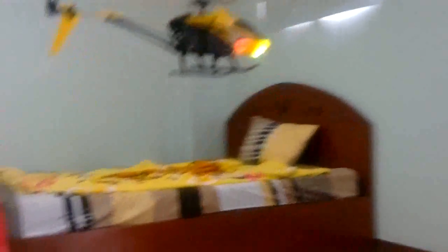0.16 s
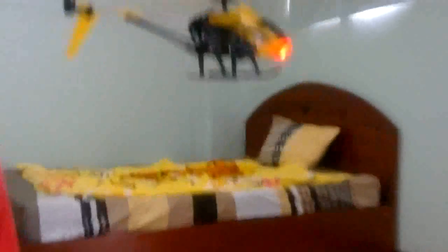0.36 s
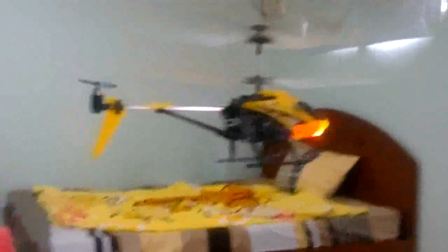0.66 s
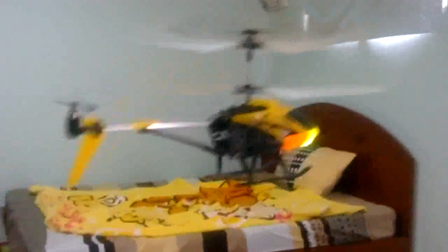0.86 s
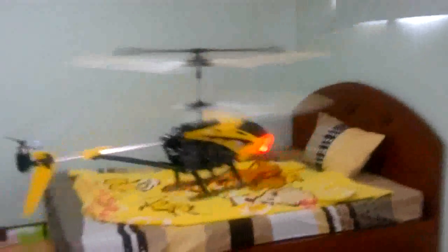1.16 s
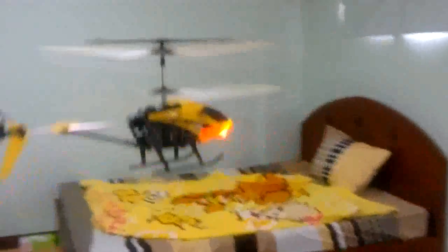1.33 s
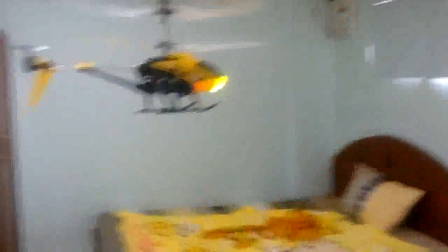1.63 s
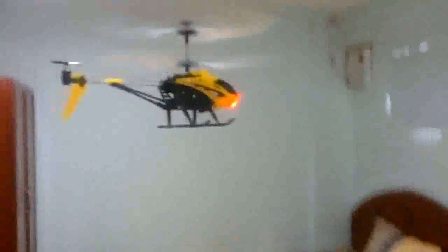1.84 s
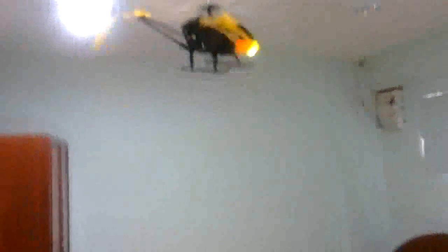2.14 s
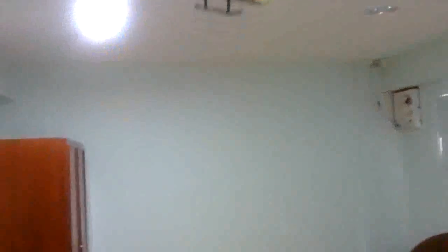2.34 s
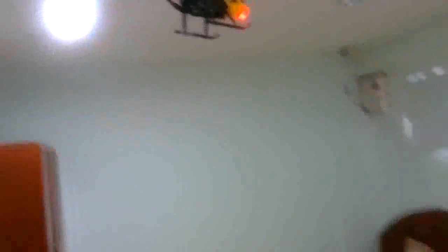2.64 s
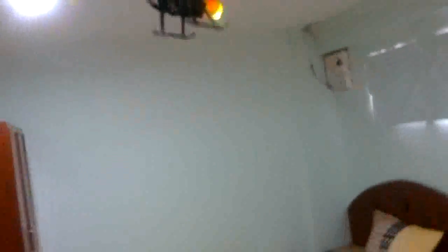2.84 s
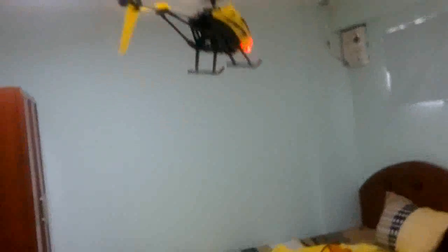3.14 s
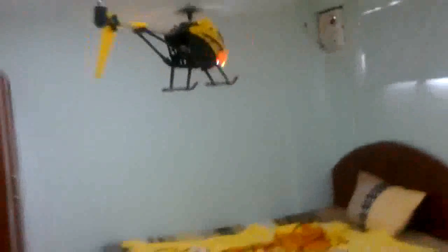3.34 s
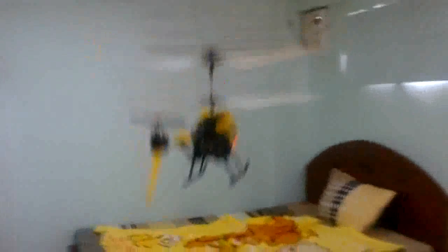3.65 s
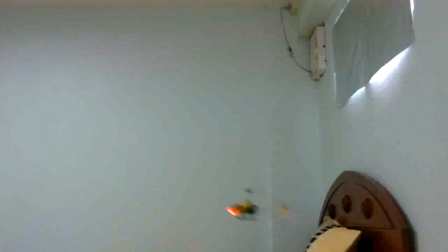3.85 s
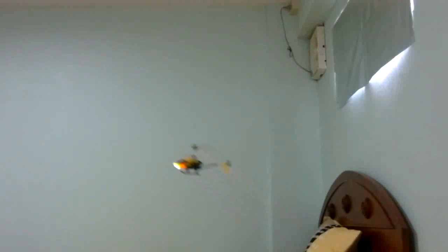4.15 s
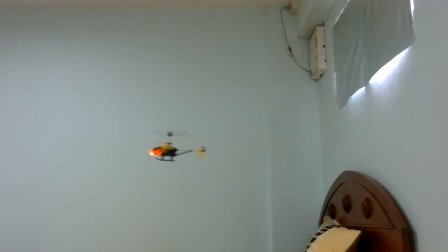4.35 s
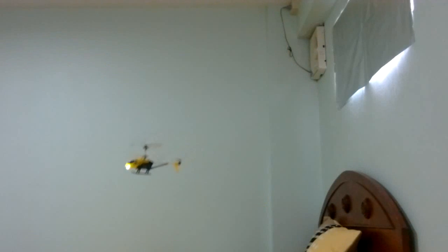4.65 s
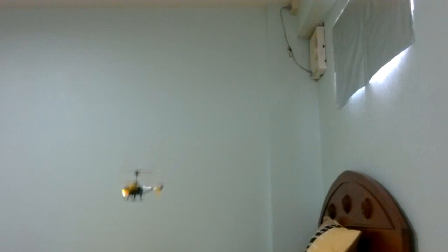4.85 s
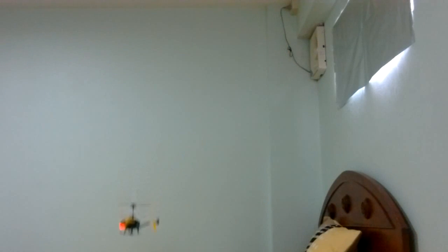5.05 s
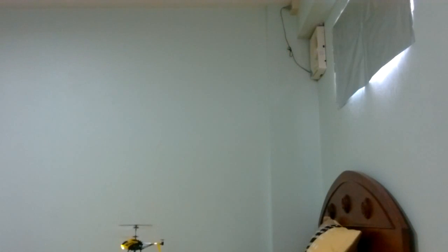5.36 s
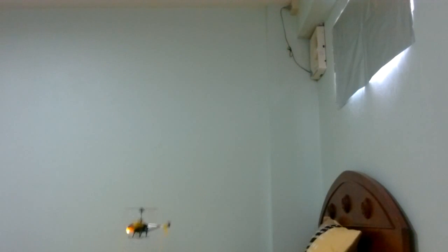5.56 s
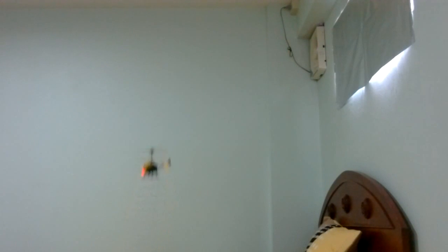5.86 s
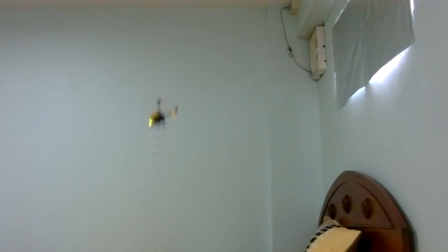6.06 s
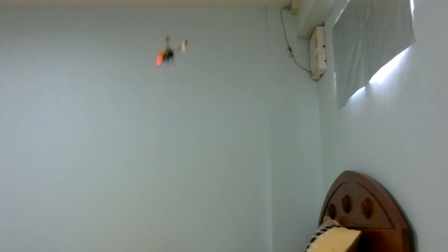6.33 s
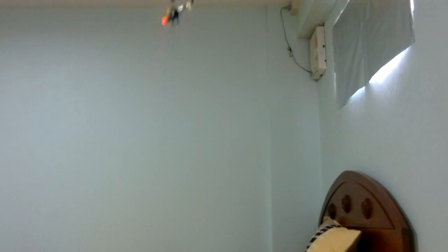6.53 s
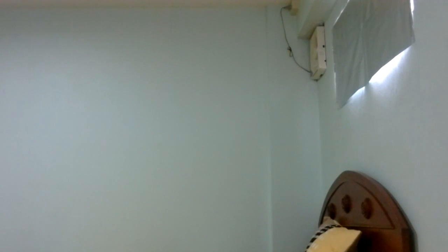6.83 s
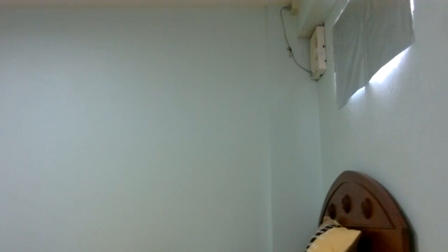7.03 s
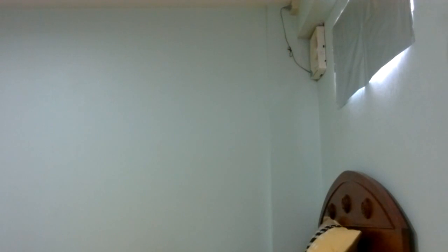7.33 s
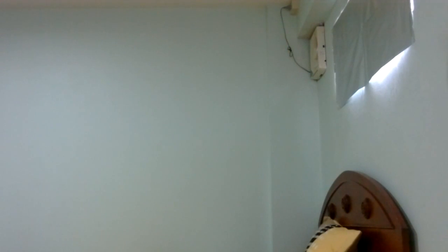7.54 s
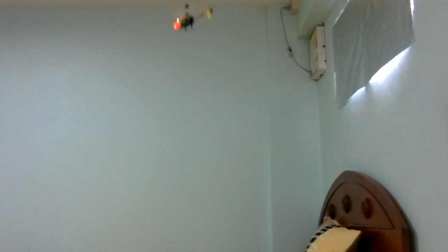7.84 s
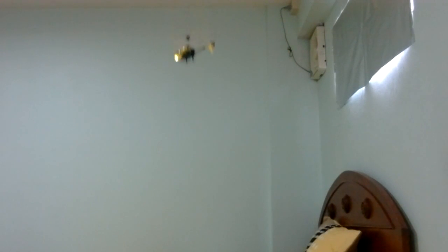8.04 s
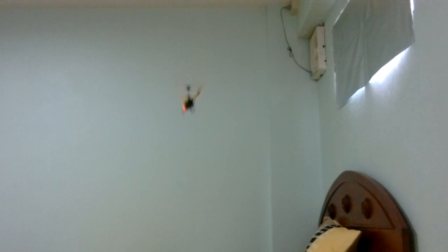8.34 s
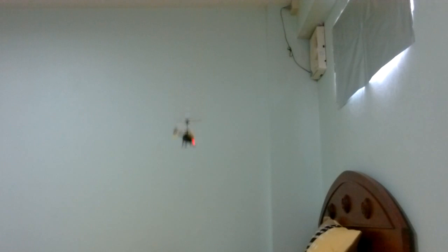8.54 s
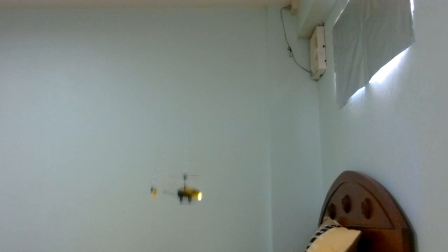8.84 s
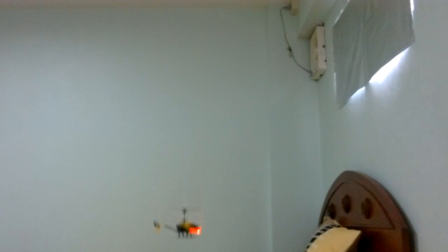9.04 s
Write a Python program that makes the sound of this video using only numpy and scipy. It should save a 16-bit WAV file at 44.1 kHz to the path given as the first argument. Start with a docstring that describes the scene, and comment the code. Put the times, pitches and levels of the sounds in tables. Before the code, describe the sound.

Two high motor tones whine together over rattling plastic gears and a light hiss as a toy helicopter flies around a bare room. It starts near the microphone, holding its pitch and then sagging a little. The sound cuts out for an instant and resumes at a distance, softer and with more room echo. There the whine keeps falling and rising, peaking around six seconds, and carries on to the end.

```python
"""A small coaxial toy helicopter flies about a bare bedroom, first close by, then farther off.
Two pulse-driven motors, one for each rotor, whine through plastic gears at the tooth-meshing rate,
which follows the throttle. Tooth impacts excite the frame's resonances, the brushes hiss by friction,
and the blades hum and stir the air. The walls add reverberation, a larger share at a distance."""
import sys
import numpy as np
from scipy import signal
from scipy.fft import rfft, irfft, next_fast_len
from scipy.io import wavfile
from scipy.ndimage import uniform_filter1d, map_coordinates

SR = 44100
rng = np.random.default_rng(int(sys.argv[2]) if len(sys.argv) > 2 else 0)


def to_wav(s):
    """Save 16-bit WAV."""
    ch = np.atleast_2d(s).T  # columns
    pcm = np.round(np.clip(ch, -1, 1) * 32767)  # PCM
    wavfile.write(sys.argv[1], SR, pcm.astype(np.int16))


N = 405279
TIME_S = np.arange(N) / SR

PINION_TEETH, WHEEL_TEETH = 7, 74
DRIVE_HZ = 541.2  # pulse rate of the motor current
NEAR_END_S, FAR_START_S = 3.849, 3.895


def amp(db):
    """Decibels to amplitude ratio."""
    return 10 ** (np.asarray(db) / 20)


def unit(x):
    """Normalisation to rms 1."""
    return x / np.sqrt(np.mean(x ** 2) + 1e-20)


def even(x):
    """Running normalisation to rms 1 over a tenth of a second; faster flutter stays."""
    return x / np.sqrt(np.abs(uniform_filter1d(x ** 2, SR // 10)) + 1e-12)


def along(points, hz):
    """Interpolation of (frequency_hz, value) points on a logarithmic frequency axis."""
    frequency_hz, values = np.transpose(points)
    return np.interp(np.log(hz + 1), np.log(frequency_hz + 1), values)


def wobble(rate):
    """Smooth random modulation: a spline through `rate` knots a second."""
    knots = rng.standard_normal(int(N * rate / SR) + 4)
    steps = np.arange(10 * len(knots)) / 10
    return np.interp(TIME_S * rate, steps, map_coordinates(knots, [steps]))


def filtered(x, response):
    """Linear filtering: the spectrum times a frequency response."""
    size = next_fast_len(N + SR // 2)
    return irfft(rfft(x, size) * response(np.fft.rfftfreq(size, 1 / SR)), size)[:N]


def coloured(x, spectrum):
    """Spectral shaping by (frequency_hz, gain_db) points, at rms 1."""
    return unit(filtered(x, lambda hz: amp(along(spectrum, hz))))


def by_place(near, far):
    """One value for the close flight, another for the distant one."""
    return np.where(TIME_S < NEAR_END_S, near, far)


def swells(sound):
    """Gaussian envelopes, in dB, by which one sound swells or sinks."""
    # Passing changes of level: sound, centre_s, half_length_s, gain_db
    bells = [("slow", 0.45, 0.077, 8.6), ("slow", 1.96, 0.069, 7.9), ("slow", 3.296, 0.14, 6.6),
             ("slow", 3.58, 0.12, 4.9), ("slow", 5.17, 0.05, 6.64), ("slow", 5.58, 0.12, 4.27),
             ("slow", 6.98, 0.044, 10.7), ("fast", 0.31, 0.045, 6.7), ("fast", 1.224, 0.046, 4),
             ("fast", 0.655, 0.052, 6.3), ("fast", 1.352, 0.034, 10.3), ("fast", 1.54, 0.07, 5.1),
             ("fast", 2.015, 0.058, 5.5), ("fast", 3.05, 0.15, 5), ("fast", 3.67, 0.054, 9.1),
             ("fast", 5.3, 0.083, 4), ("fast", 5.79, 0.093, 5.5), ("fast", 8.65, 0.035, 6.3),
             ("fast", 9.1, 0.031, 7.2), ("controller", 4.68, 0.29, 6.4), ("controller", 6.24, 0.12, 11),
             ("controller", 6.75, 0.21, 12), ("hum", 3.94, 0.08, 14.2), ("hum", 5.2, 0.1, 9.4),
             ("hum", 6.3, 0.2, -20), ("hum", 8.45, 0.24, -13), ("hum", 9.14, 0.1, 5),
             ("downwash", 1, 0.45, 11), ("downwash", 7.77, 0.2, 10)]
    return sum(db * np.exp(-((TIME_S - centre_s) / half_s) ** 2)
               for name, centre_s, half_s, db in bells if name == sound)


def room(x, wet_db, count=3):
    """Reverberation: direct sound plus reflections whose pattern shifts as the craft drifts."""
    # Reverberation time of the room: frequency_hz, t60_s
    walls = [(150, 0.12), (2500, 0.46), (10000, 0.14)]
    hz, t, spectra = signal.stft(rng.standard_normal((count, SR // 2)), SR, nperseg=256)
    decay = amp(-60 * t / along(walls, hz)[:, None])
    tails = signal.istft(spectra * decay, SR, nperseg=256)[1]
    running = np.pad(x, (tails.shape[1] - 1, 0), "reflect")  # the room already rings at the start
    reflections = signal.oaconvolve(running[None], tails / np.linalg.norm(tails[0]), "valid", axes=1)
    drift = np.array([wobble(1.5) for _ in range(count)])
    wet = np.sum(reflections * drift, axis=0) / np.sqrt(np.sum(drift ** 2, axis=0) + 0.055)
    return unit(x + amp(wet_db) * wet)


def teeth_passed(tooth_hz, flutter, hunting):
    """Phase, in teeth, is the integral of rate; load and throttle add flutter, the gyro slow hunting."""
    octaves_per_s = uniform_filter1d(np.abs(np.gradient(np.log2(tooth_hz))) * SR, size=SR // 10)
    unsteady = flutter + 0.005 * octaves_per_s
    return np.cumsum(tooth_hz * (1 + unsteady * wobble(45) + hunting * wobble(6))) / SR


def whine_gain(sound, tooth_hz, gear):
    """Interference with a wall's echo, weaker in swells, adds to the gear's response; all in dB."""
    swell_db = swells(sound)
    echo = np.clip(0.49 * amp(-swell_db), 0, .95)
    lag_rad = 2.43 * wobble(6)  # the echo slides in and out of step as the craft drifts
    interference_db = 10 * np.log10(1 + 2 * echo * np.cos(lag_rad) / (1 + echo ** 2))
    return along(gear, tooth_hz) + swell_db + interference_db


def whine(teeth, level_db, wet_db, runout, rough):
    """The gear-mesh tone, amplitude-modulated once a rotor turn by an off-centre wheel."""
    throb = 1 + runout * np.sin(2 * np.pi * teeth / WHEEL_TEETH) + rough * wobble(160)
    return amp(level_db) * even(room(throb * np.sin(2 * np.pi * teeth), wet_db))


def frame(x):
    """Forced vibration: the frame's resonances colour x, differently at each place in the room."""
    # The frame's response close by and from afar: frequency_hz, gain_db
    frame_near = [(900, -38), (1500, -20), (1900, -16.5), (2150, -4), (2500, -4), (2950, 0), (3250, -8),
                  (3550, -7.5), (3850, -4), (4300, -11), (5050, -5), (5900, -9.5), (8000, -12),
                  (11000, -13.5)]
    frame_far = [(900, -29), (1500, -14), (1850, -11.5), (2100, -3), (2400, 1.5), (3000, 1.5), (3250, -8.5),
                 (3850, -3.5), (4300, -10), (5050, -2.5), (5900, -6), (8000, -21), (11000, -38)]
    return by_place(coloured(x, frame_near), coloured(x, frame_far))


def overtones(teeth, upper_db, lower_db, wet_db):
    """Shaft harmonics, and the modulation sidebands that the pulsed current sets around the mesh tone."""
    # Harmonics of the motor shaft that shake the frame: order, relative_db
    shaft = [(5, -7.5), (6, -0.5), (8, -2.5), (9, -11.5), (13, -3.5), (14, 3), (15, -7), (21, 2), (28, 0)]
    turns = teeth / PINION_TEETH + 0.0037 * wobble(200)  # backlash blurs the high orders
    orders = np.zeros(N)
    for order, db in shaft:
        strength = amp(db + 3.9 * wobble(7) + 2.2 * wobble(40))
        orders += strength * np.sin(2 * np.pi * (order * turns + rng.random()))
    pulses = DRIVE_HZ * TIME_S
    upper = amp(upper_db) * np.sin(2 * np.pi * (teeth + pulses))
    lower = amp(lower_db) * np.sin(2 * np.pi * (teeth - pulses))
    return even(frame(room(orders + upper + lower, wet_db)))


def tooth_clicks(teeth, loose, scatter=0.06):
    """An impulse per tooth: the wheel's flaws repeat every turn, backlash varies timing and force."""
    tooth = np.arange(1, int(teeth[-1]))
    flaws = rng.standard_normal(WHEEL_TEETH)
    timing_error, force_error = rng.standard_normal((len(tooth), 2)).T
    at_sample = np.interp(tooth + scatter * timing_error, teeth, np.arange(N))
    force = flaws[tooth % WHEEL_TEETH] + loose * force_error
    return np.bincount(np.round(at_sample).astype(int), force, N)


def rasp(teeth):
    """Random modulation by uneven tooth forces spreads a noise band around each mesh harmonic."""
    # Bands around the mesh harmonics: harmonic, width_hz, relative_db
    skirts = [(1, 330, -5.5), (2, 420, -8), (3, 900, -15)]
    return sum(amp(db) * wobble(width) * np.sin(2 * np.pi * (k * teeth + 0.15 * wobble(width / 2)))
               for k, width, db in skirts)


def gears(slow, fast, gain_db):
    """Impact excitation: both gear trains rattle the frame and rasp at their own pitch."""
    clicks = tooth_clicks(slow, loose=0.84) + tooth_clicks(fast, loose=1.0)
    rattle = amp(5.5) * frame(room(clicks, wet_db=-3.5))
    grind = amp(by_place(-2, 0)) * room(rasp(slow) + rasp(fast), wet_db=-2.5)
    return amp(gain_db + 0.39 * wobble(14)) * (rattle + grind)


def brushes(teeth, level_db, depth):
    """Friction noise of the brushes, modulated once a turn of the motor shaft."""
    # Spectrum of the sliding contact: frequency_hz, gain_db
    hiss = [(1500, -43.5), (3500, 2), (6000, -2), (8200, 4), (9500, 3.5), (10400, -5.5)]
    scrape = rng.standard_normal(N) * (1 + depth * np.sin(2 * np.pi * teeth / PINION_TEETH))
    return amp(level_db + 0.45 * wobble(12)) * coloured(scrape, hiss)


def frame_ring(pitch_hz, width_hz, level_db, hold_s, fall_db_per_s):
    """Resonance: one sharp mode of the frame, shaken at random, holds and then dies away."""
    envelope = amp(level_db - fall_db_per_s * np.maximum(TIME_S - hold_s, 0))
    mode = filtered(rng.standard_normal(N), lambda hz: 1 / (1 + (2 * (hz - pitch_hz) / width_hz) ** 2))
    return envelope * unit(mode)


def low_tone(hz, gain_db):
    """Standing waves: a gliding low tone swells as it crosses the room's modes."""
    # The room's response to low tones: frequency_hz, gain_db
    low_modes = [(235, -77), (268, -62.5), (295, -76), (325, -67), (350, -65.5), (385, -69), (415, -65),
                 (480, -66), (520, -71), (650, -65.5)]
    rms = amp(gain_db + along(low_modes, hz) + 3.6 * wobble(9))
    return np.sqrt(2) * rms * np.sin(2 * np.pi * np.cumsum(hz) / SR)


def rotors(teeth, tooth_hz, wash_db, unbalance_db):
    """Periodic blade loading hums and buzzes, unbalance adds a shaft tone, turbulence a wash of air."""
    # Blade hum as the room's modes shape it, close by and far off: pitch_hz, level_db
    hum_near = [(127, -61), (139, -61), (150, -61.5)]
    hum_far = [(131, -78), (139, -68), (147, -63), (152, -58), (160, -52), (171, -58)]
    # Harmonics of the rotor's turning rate: order, relative_db
    blade_orders = [(8, -1), (10, -2), (12, 6.5), (14, -13), (16, 3)]
    # Spectrum of the stirred air: frequency_hz, gain_db
    turbulence = [(20, -25), (70, -26), (105, -41), (220, -42.5), (300, -17), (360, -9), (560, -0.5),
                  (800, -1), (1150, 1.5), (1700, -6), (2600, -12)]
    crossings_per_tooth = 4 / WHEEL_TEETH  # two pairs of blades cross four times a turn
    hum_hz = crossings_per_tooth * tooth_hz
    hum_db = by_place(along(hum_near, hum_hz), along(hum_far, hum_hz)) + swells("hum")
    hum = amp(hum_db + 2.6 * wobble(8.3)) * np.sin(2 * np.pi * crossings_per_tooth * teeth)
    buzz = amp(-3.5) * sum(low_tone(order * tooth_hz / WHEEL_TEETH, db) for order, db in blade_orders)
    shake = low_tone(tooth_hz / PINION_TEETH, unbalance_db)
    wash = amp(wash_db + 0.77 * wobble(7.6)) * coloured(rng.standard_normal(N), turbulence)
    return hum + buzz + shake + wash


def downwash(level_db, gust_db):
    """Wind noise: pressure fluctuations in the rotors' gusts rumble faintly on the microphone."""
    # Spectrum of the gusts: frequency_hz, gain_db
    rumble = [(20, -6), (50, -5), (78, -7), (95, -22), (200, -39), (600, -92.5)]
    envelope = amp(level_db + swells("downwash") - gust_db * wobble(7))
    return envelope * coloured(rng.standard_normal(N), rumble)


def controller(level_db, octave_db):
    """Magnetic forces of the chopped current make the windings sing at the pulse rate and its octave."""
    wavering_db = level_db + swells("controller") + wobble(3.04)
    phase = 2 * np.pi * DRIVE_HZ * TIME_S + 0.25 * wobble(4.7)
    tone = np.sin(phase) + amp(octave_db + 4.1 * wobble(4)) * np.sin(2 * phase)
    return amp(wavering_db + 1.75 * wobble(15)) * unit(tone)


def faint_tone(pitch_hz, level_db):
    """A faint pure tone of steady pitch wavers slowly in amplitude."""
    return amp(level_db + 1.6 * wobble(3.15)) * np.sin(2 * np.pi * pitch_hz * TIME_S)


def hoot(centre_s, half_length_s, pitch_hz, peak_db):
    """A brief low tone swells and fades under a Gaussian envelope."""
    t = TIME_S - centre_s
    return amp(peak_db) * np.exp(-(t / half_length_s) ** 2) * np.sin(2 * np.pi * pitch_hz * t)


def scene():
    """Superposition of all sources; farther off, reverberation takes over from the direct path."""
    # Mesh rates of the slower motor and of the faster one, which also steers: time_s, tooth_hz
    slow_motor = [(0.0, 2476), (1.2, 2487), (2.12, 2478), (2.5, 2243), (2.73, 2212), (2.95, 2281),
                  (3.25, 2303), (3.84, 2310), (3.9, 2477), (4.1, 2478), (4.3, 2311), (5.0, 2067),
                  (5.17, 2331), (5.5, 2545), (6.1, 2627), (6.48, 2510), (6.84, 2363), (7.3, 2278),
                  (7.8, 2242), (8.3, 2299), (8.55, 2225), (8.95, 2266), (9.18, 2357)]
    fast_motor = [(0.0, 2736), (0.65, 2766), (0.85, 2737), (1.35, 2760), (2.07, 2767), (2.25, 2676),
                  (2.4, 2445), (2.65, 2355), (2.9, 2578), (3.84, 2576), (3.9, 2751), (4.13, 2826),
                  (4.35, 2491), (4.8, 2396), (4.9, 2553), (5.11, 2521), (5.3, 2841), (5.55, 2957),
                  (5.91, 3012), (5.96, 3180), (6.03, 3160), (6.09, 2864), (6.5, 2745), (6.81, 2555),
                  (7.3, 2475), (7.8, 2428), (8.0, 2451), (8.3, 2512), (8.4, 2703), (8.6, 2550),
                  (8.92, 2538), (9.18, 2764)]
    # How strongly each gear train sings at a given mesh rate: tooth_hz, gain_db
    slow_gear = [(2070, -10), (2200, -2.5), (2320, 1.5), (2480, 0.5), (2550, 3.5), (2610, -6.5)]
    fast_gear = [(2430, -11.5), (2570, -2.5), (2670, 1.5), (2760, 1.5), (3000, 2), (3180, -4)]
    slow_hz = np.interp(TIME_S, *np.transpose(slow_motor))
    fast_hz = np.interp(TIME_S, *np.transpose(fast_motor))
    slow = teeth_passed(slow_hz, flutter=.001, hunting=.0005)
    fast = teeth_passed(fast_hz, flutter=.0014, hunting=.0008)
    hover_hz = 2500
    octaves_above_hover = np.log2((slow_hz + fast_hz) / 2 / hover_hz)
    rattle_db = by_place(-30, -37) + 6 * octaves_above_hover  # faster motors are louder
    hiss_db = by_place(-29.5, -35) + 12.5 * octaves_above_hover
    wet_db = by_place(-2.5, 1.0)

    slow_db = by_place(-29, -35.5) + whine_gain("slow", slow_hz, slow_gear)
    mix = whine(slow, slow_db, wet_db, runout=0.23, rough=0.055)
    fast_db = by_place(-26.5, -32.5) + whine_gain("fast", fast_hz, fast_gear)
    mix += whine(fast, fast_db, wet_db, runout=0.11, rough=0.14)
    mix += amp(rattle_db + by_place(-3, -2)) * overtones(slow, upper_db=-2, lower_db=-20, wet_db=wet_db)
    mix += amp(rattle_db + by_place(-.5, 0)) * overtones(fast, upper_db=0, lower_db=-7.5, wet_db=wet_db)
    mix += gears(slow, fast, rattle_db - .5)
    mix += brushes(fast, hiss_db, depth=.2)
    mix += frame_ring(pitch_hz=3830, width_hz=140, level_db=-32.5, hold_s=1.8, fall_db_per_s=44)
    mix += rotors(fast, fast_hz, wash_db=-45, unbalance_db=1)
    mix += downwash(level_db=by_place(-72.5, -83), gust_db=1.5)
    mix += controller(level_db=by_place(-55.5, -57.5), octave_db=-10.5)
    mix += faint_tone(pitch_hz=1191, level_db=by_place(-80, -54))
    mix += hoot(centre_s=6.02, half_length_s=0.085, pitch_hz=489, peak_db=-44.5)
    return np.array([mix, mix])


def record(dry):
    """Band-limited mono sound, gated off for an instant between the two flights."""
    cutoff_hz = 10480
    gate = uniform_filter1d(1.0 * ((TIME_S < NEAR_END_S) | (TIME_S > FAR_START_S)), size=40)
    mono = filtered(dry.mean(axis=0) * gate, lambda hz: hz < cutoff_hz)
    return np.array([mono, mono])


dry = scene()
out = record(dry)
to_wav(out)
```